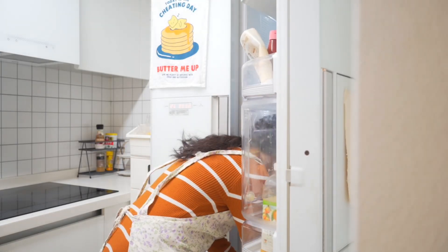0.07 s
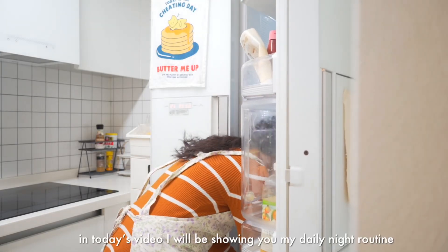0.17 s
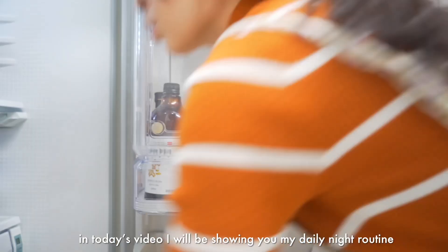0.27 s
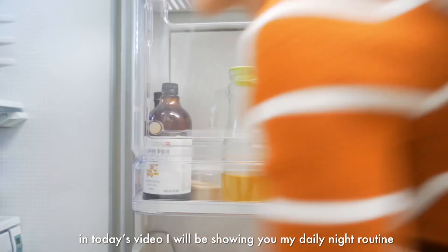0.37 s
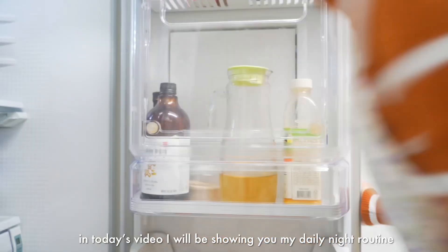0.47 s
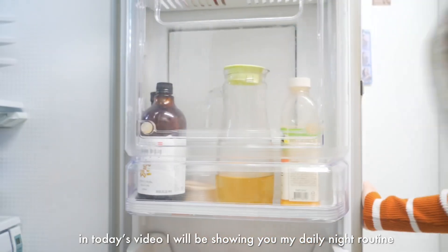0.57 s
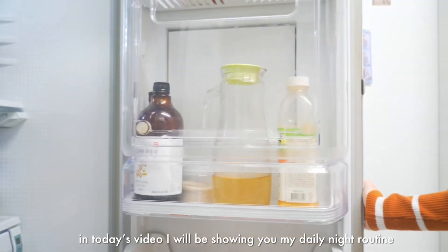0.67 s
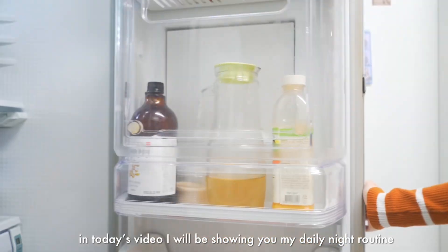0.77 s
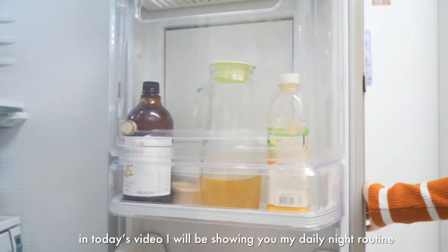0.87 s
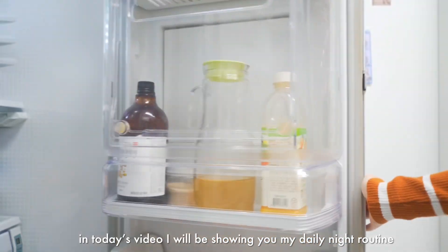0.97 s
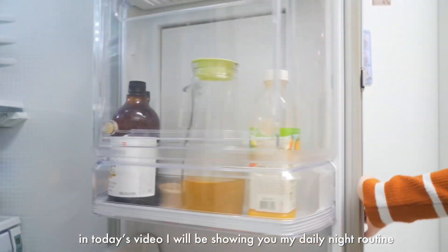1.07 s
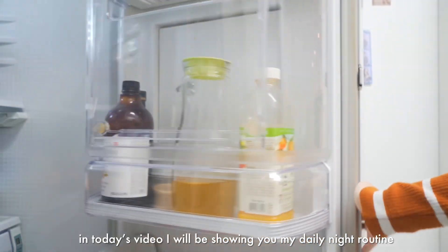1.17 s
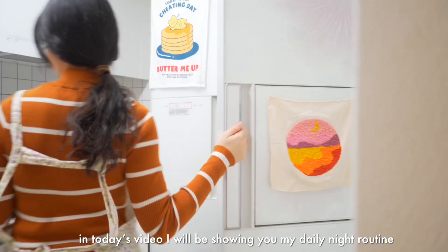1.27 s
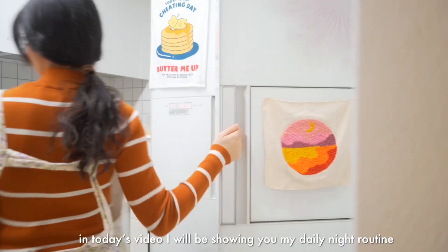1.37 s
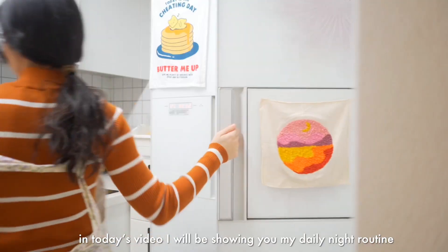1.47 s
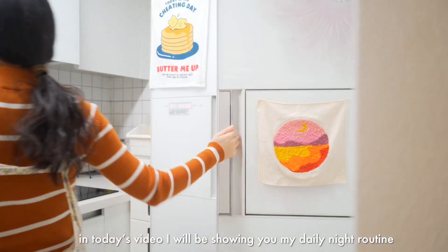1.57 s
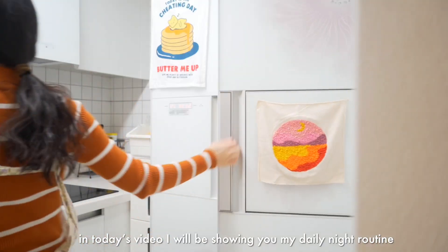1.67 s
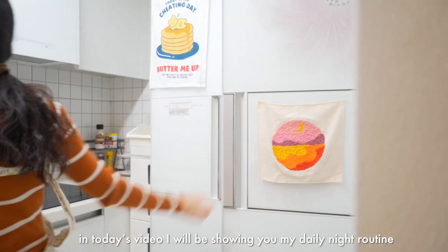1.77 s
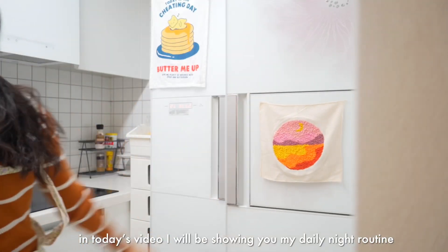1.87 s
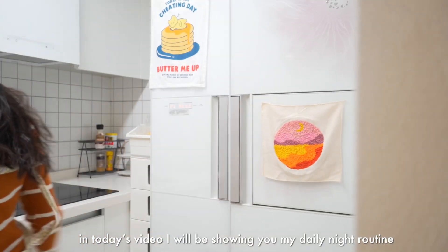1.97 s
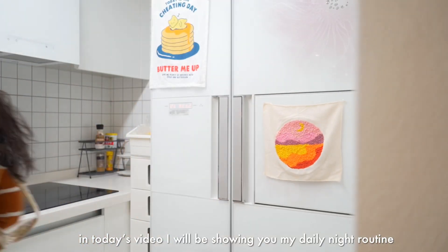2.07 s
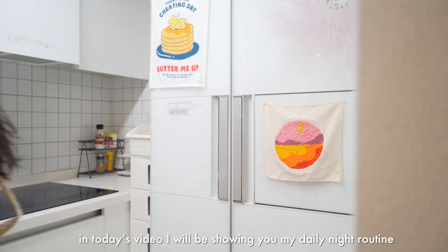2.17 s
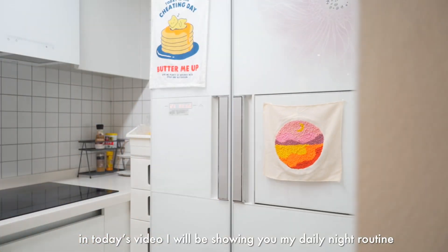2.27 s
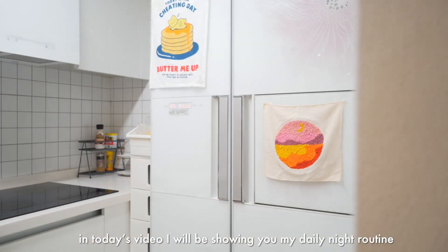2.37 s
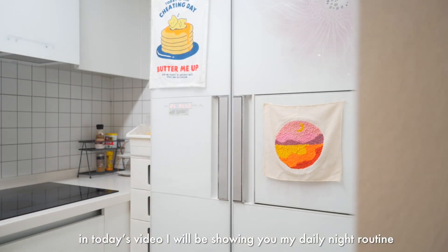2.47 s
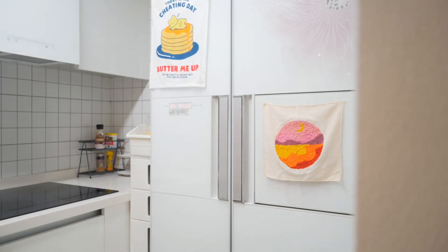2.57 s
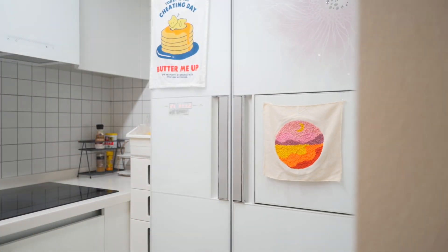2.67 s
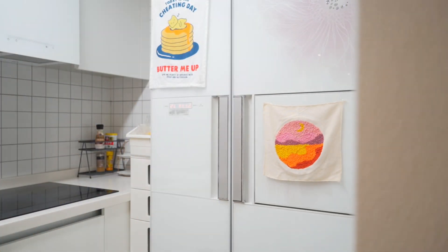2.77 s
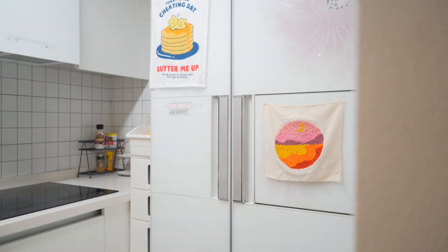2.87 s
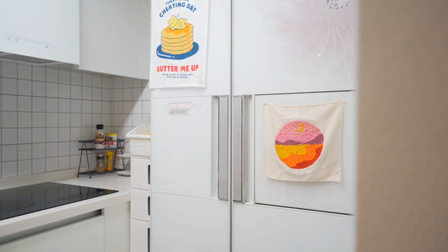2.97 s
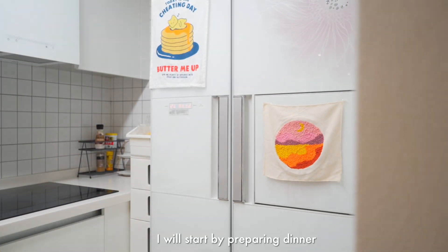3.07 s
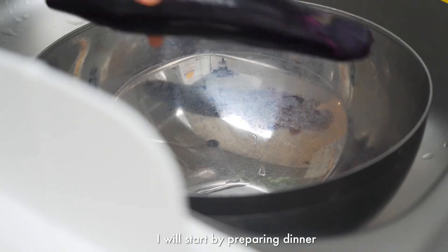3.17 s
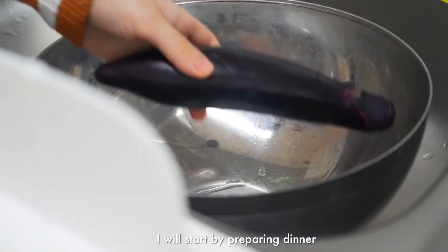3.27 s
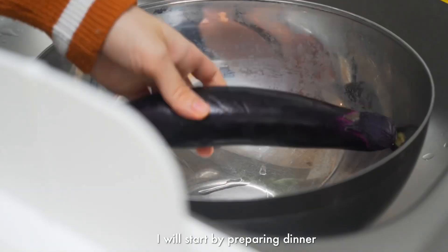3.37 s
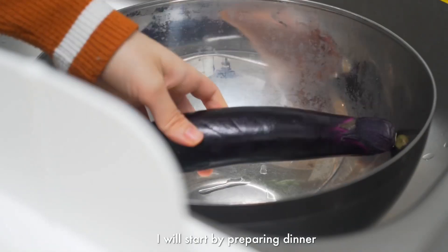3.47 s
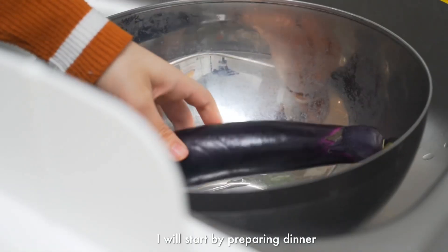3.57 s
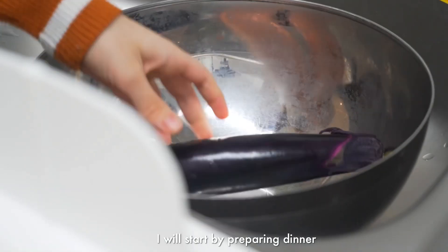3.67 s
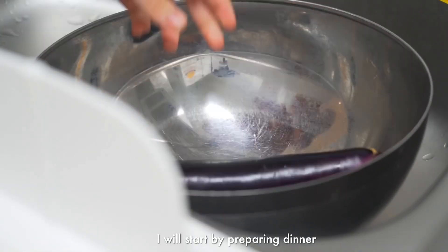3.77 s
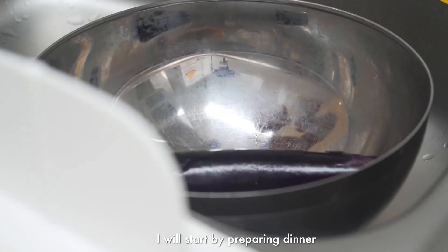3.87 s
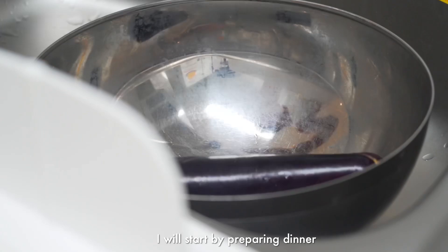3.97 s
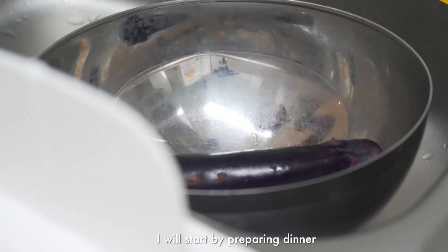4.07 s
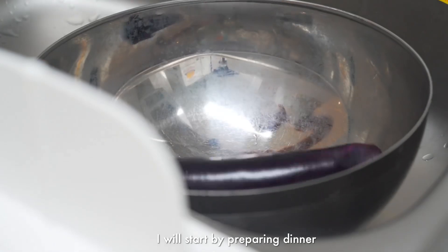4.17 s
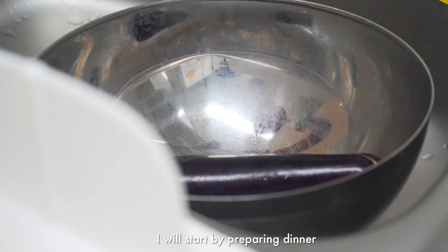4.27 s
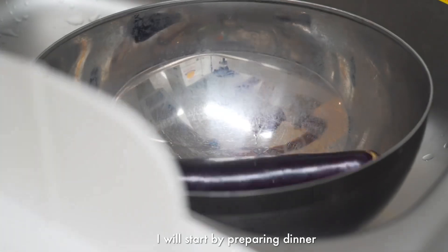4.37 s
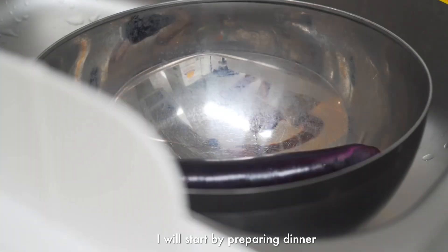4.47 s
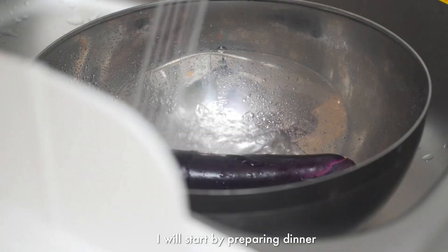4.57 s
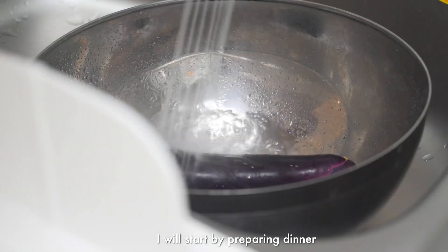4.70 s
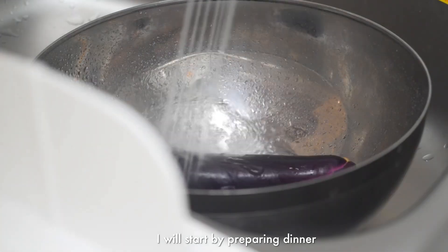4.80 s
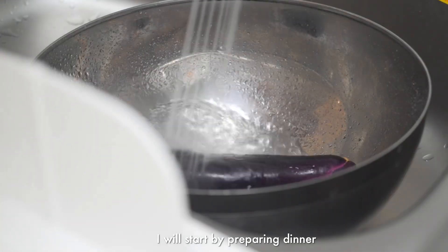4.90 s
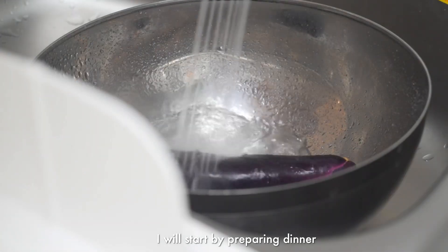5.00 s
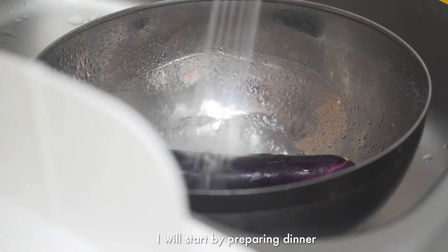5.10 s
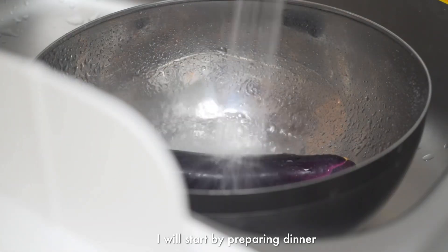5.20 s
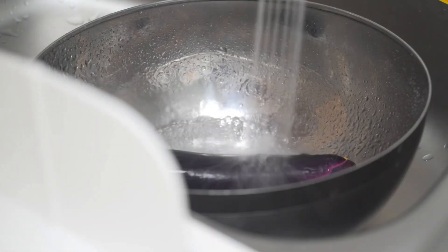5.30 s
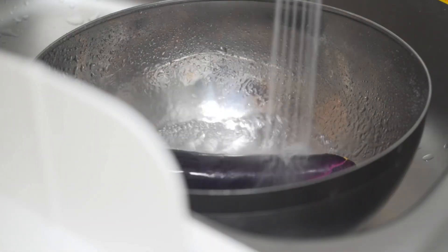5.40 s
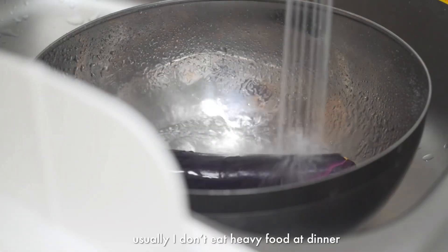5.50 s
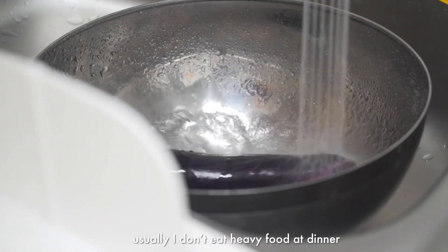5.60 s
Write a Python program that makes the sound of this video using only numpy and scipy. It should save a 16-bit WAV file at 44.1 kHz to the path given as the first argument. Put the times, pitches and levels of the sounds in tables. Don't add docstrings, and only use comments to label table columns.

```python
import sys
import numpy as np
from scipy import signal
from scipy.fft import rfft, irfft
from scipy.io import wavfile
from scipy.ndimage import uniform_filter1d

SR = 44100
rng = np.random.default_rng(int(sys.argv[2]) if len(sys.argv) > 2 else 0)


def volts_from_db(level):
    exponent = np.asarray(level, float) / 20
    return 10 ** exponent


def unload_audio(sound):
    columns = np.transpose(np.atleast_2d(sound))
    steps = np.round(np.clip(columns, -1, 1) * 32767)
    wavfile.write(sys.argv[1], SR, steps.astype(np.int16))


N = 248724
T = np.arange(N) / SR
CUT_S = 3.076

# (frequency [Hz], left-right likeness [-1 to 1])
SPRAY_SAME = [(60, 1.0), (180, 1), (550, 0.95), (1650, 0.69), (2800, 0.63), (4970, 0.48), (15000, 0.21)]


def evened(x):
    return x / np.sqrt(np.mean(x ** 2) + 1e-20)


def read(points, hz):
    f, value = np.transpose(points)
    return np.interp(np.log(hz + 1), np.log(f + 1), value)


def columns(rows):
    s, *values = np.transpose(rows)
    return [np.interp(T, s, v) for v in values]


def between(start, end, edge=0.0033):
    return np.clip((T - start) / edge, 0, 1) * np.clip((end - T) / edge, 0, 1)


def add(mix, s, sound):
    part = mix[:, round(s * SR):][:, :sound.shape[-1]]
    part += sound[..., :part.shape[1]]


def pair(left, other, colour, same, lag_s=0., lean=((1, 0), (2e4, 0))):
    hz = np.fft.rfftfreq(len(left), 1 / SR)
    a, b = rfft(left), rfft(other)
    likeness = np.clip(read(same, hz), -1, 1)
    delay = np.exp(-2j * np.pi * hz * lag_s)
    right = likeness * a * delay + np.sqrt(1 - likeness ** 2) * b
    half_db = read(lean, hz) / 2
    ports = np.array([a * volts_from_db(half_db), right * volts_from_db(-half_db)])
    return evened(irfft(volts_from_db(read(colour, hz)) * ports, len(left)))


def patchy(x, patchy_db, flicker_db, bins, frames):
    z = signal.stft(x, nperseg=256)[2]
    patches = rng.standard_normal(z.shape[:0:-1]).T
    patches = uniform_filter1d(patches, size=bins, axis=0)
    patches = evened(uniform_filter1d(patches, size=frames, axis=1))
    flicker = evened(uniform_filter1d(rng.standard_normal(z.shape[2]), size=2))
    z = z * volts_from_db(patchy_db * patches + flicker_db * flicker)
    return evened(signal.istft(z, nperseg=256)[1][:, :N])


def grains(per_s, spread_db):
    size = volts_from_db(spread_db * np.minimum(rng.exponential(1, N), 3)) * rng.uniform(-1, 1, N)
    return evened(size * (rng.random(N) < per_s / SR))


def resonate(x, hz, width_hz):
    r = np.exp(-np.pi * width_hz / SR)
    return evened(signal.lfilter([1, 0, -1], [1, -2 * r * np.cos(2 * np.pi * hz / SR), r * r], x))


def ring(x, modes, wander_db):
    out, t = 0, np.arange(x.shape[1])
    for hz, width_hz, db, drift_db in modes:
        wander = np.interp(t, np.arange(0, N, 3000), rng.standard_normal(N // 3000 + 1))
        level_db = db + wander_db * wander + drift_db * (t - t.mean()) / SR
        out = out + volts_from_db(level_db) * resonate(x, hz, width_hz)
    return np.pad(evened(out), ((0, 0), (N - len(t), 0)))


def burst(colour, t60s, same, rise=0.34, crack=0.69, lag_s=0., size=30000):
    noise = rfft(pair(*rng.standard_normal((2, size)), colour, same, lag_s))
    hz, t = np.fft.rfftfreq(size, 1 / SR), np.arange(size) / SR
    centres = np.array(t60s)[:, 0]
    out = 0
    for k, (centre, t60) in enumerate(t60s):
        share = read(np.c_[centres, np.arange(len(centres)) == k], hz)
        envelope = volts_from_db(-60 * t / t60) * (1 - np.exp(-t * centre / rise))
        out = out + irfft(noise * share, size) * envelope
    return out * (1 + crack * np.exp(-t / 0.0043))


def cluster(hz, t, spread):
    spread = spread * min(hz / 1200, 1)
    ratios = [1 + spread * (k + rng.uniform(-0.58, 0.69)) for k in (-1, 0, 1)]
    return sum(np.sin(2 * np.pi * hz * ratio * t) for ratio in ratios) / 2


def chime(modes, spread=0.0171, size=12000):
    t = np.arange(size) / SR
    out = 0
    for hz, db, t60 in modes:
        out = out + volts_from_db(db + 0.73 * rng.random() - 60 * t / t60) * cluster(hz, t, spread)
    return out / len(modes) ** .5


def booms(rows, rise, spread):
    out = np.zeros((1, N))
    for s, hz, db, t60 in rows:
        t = np.arange(0, min(t60, .5), 1 / SR)
        onset = (1 - np.exp(-t * hz / rise)) ** 2
        add(out, s, volts_from_db(db - 3.5 - 60 * t / t60) * cluster(hz, t, spread) * onset)
    return out


def struck(modes, hits, scatter):
    return [(s, hz * (1 + scatter * rng.uniform(-1.14, 1)), db + hit_db, t60)
            for s, hit_db in hits for hz, db, t60 in modes]


def room_tone():
    # (start [s], rumble level [dB], air level [dB])
    shots = [
        (0, -48.5, -55.5),
        (.05, -48.5, -60),
        (.236, -50, -51),
        (3.076, -48.5, -56.5),
        (4.49, -50, -62),
    ]
    # (frequency [Hz], density [dB per Hz])
    fridge_colour = [(15, -66), (25, -28), (70, -4), (151, -7.5), (216, -1), (460, -20), (718, -16.5),
                     (1500, -29.5), (3300, -120)]
    rumble_colour = [(12, -45), (35, 1), (80, -1.5), (130, 0.5), (250, -1.5), (450, -10), (850, -11),
                     (1100, -18.5), (3000, -40)]
    air_colour = [(500, -9), (1000, -13), (2000, -11), (5000, -15), (13000, -18), (16500, -19)]
    # (frequency [Hz], left-right likeness [-1 to 1])
    diffuse = [(60, 0.99), (180, 1), (550, 0.73), (1650, -0.096), (4970, -0.28), (15000, 0.06)]
    start, rumble_db, air_db = np.transpose(shots)
    shot = np.searchsorted(start[1:], T)
    fridge, rumble, air = (pair(*rng.standard_normal((2, N)), colour, diffuse)
                           for colour in (fridge_colour, rumble_colour, air_colour))
    hum = volts_from_db(-51) * np.sin(2 * np.pi * 81.3 * T) * between(0.19, 1.28, 0.05)
    return volts_from_db(rumble_db[shot]) * np.where(T < CUT_S, fridge, rumble) + volts_from_db(air_db[shot]) * air + hum


def squeezing():
    # (peak time [s], rise [s], crinkle level [dB], relative dull level [dB])
    squeezes = [(.535, 0.059, -47.5, -5.5), (.6, 0.05, -45, -5), (1.035, 0.067, -49.5, -0.5),
                (1.28, .09, -43.5, -8), (1.4, 0.23, -49, -5), (1.51, 0.094, -43, -8.5),
                (1.68, 0.3, -50.5, -2), (1.78, 0.35, -47.5, -10), (1.88, 0.14, -53, 4.5),
                (1.97, 0.18, -55.5, 10.5), (2.011, 0.022, -32.5, 4), (2.09, 0.1, -43.5, 15),
                (2.175, .12, -42, 7), (2.26, 0.041, -35.5, -5), (2.365, 0.12, -26.5, -9.5),
                (2.43, 0.054, -31.5, -4), (2.571, 0.095, -32.5, -5), (2.731, 0.018, -33, -1),
                (2.84, 0.26, -32, -19), (2.91, 0.15, -41.5, -5.5), (3.045, .03, -46, -7)]
    relax_db_per_s = 107
    rest_db, rest_dull_db = -64.5, 1.5
    s, rise, db, dull_db = np.transpose(squeezes)[:, :, None]
    t = T[::32]
    level_db = db - np.where(t < s, 20 * (s - t) / rise, relax_db_per_s * (t - s))
    crisp = volts_from_db(2 * rest_db) + volts_from_db(2 * level_db).sum(axis=0)
    dull = volts_from_db(2 * (rest_db + rest_dull_db)) + volts_from_db(2 * (level_db + dull_db)).sum(axis=0)
    return np.interp(T, t, np.sqrt(crisp)), np.interp(T, t, np.sqrt(dull))


def bag():
    # (frequency [Hz], density [dB per Hz])
    crinkle_colour = [(1470, -25), (2500, -4), (4590, -3.5), (5770, 0), (10000, -0.5), (15100, -0.5),
                      (16500, -9.5)]
    body_colour = [(88, -41), (150, -7), (419, -0.5), (507, -4), (641, -7), (690, -3.5), (5000, -24.5),
                   (6500, -49), (11000, -120)]
    # (time [s], peak level [dB], relative dull level [dB])
    snaps = [(0.2352, -49.5, 4), (0.3292, -51, -3), (0.598, -27, -8), (.605, -25.5, -7), (1.0286, -44, 1),
             (1.3674, -29, -20), (1.5398, -29.5, -12), (1.9969, -23.5, -2.5), (2.1209, -25, 2),
             (2.1519, -19, -9.5), (2.176, -23, -12), (2.2666, -19.5, -24), (2.3342, -28, 1),
             (2.389, -14.5, -17), (2.4676, -17.5, -16), (2.507, -18, -11), (2.56, -28.5, 0.5),
             (2.6354, -17.5, -14.5), (2.7268, -23, -7.5), (2.852, -27, -4)]
    # (frequency [Hz], left-right likeness [-1 to 1])
    near = [(100, 1), (600, 0.92), (1500, 0.67), (4000, 0.076), (15000, 0.068)]
    crisp, dull = squeezing()
    crinkle = pair(grains(14000, 2.2), grains(14000, 1.0), crinkle_colour, near, lag_s=7e-5)
    crinkle = patchy(crinkle, 1.4, 0.35, bins=20, frames=6)
    body = pair(grains(5000, 4.3), grains(5000, 0.8), body_colour, near, lag_s=3e-5)
    out = (volts_from_db(3.0) * crisp * crinkle + volts_from_db(1.0) * dull * body) * between(.236, 3.08)
    t60 = 0.12
    crisp_t60 = [(3000, t60), (12000, 0.73 * t60)]
    dull_t60 = [(400, 0.64 * t60), (2500, 4.3 * t60)]
    for s, db, dull_db in snaps:
        snap = burst(crinkle_colour, crisp_t60, near, lag_s=7e-5, size=8000)
        add(out, s, volts_from_db(db - 10.0) * snap)
        add(out, s, volts_from_db(db + dull_db - 5.5) * burst(body_colour, dull_t60, near, size=8000))
    return out * volts_from_db([[.9], [-.9]])


def door():
    # (time [s], frequency [Hz], level [dB], t60 [s])
    panels = [(.236, 40, -35, 0.23), (0.24, 194, -39.5, 0.16), (.325, 1000, -40.5, 0.075),
              (.51, 764, -47, .1), (.527, 763, -45, .15), (1.972, 236, -24, 0.08), (2.003, 57, -9, 0.11),
              (2.008, 210, -18, 0.12), (2.035, 48.6, -15.5, 0.26), (2.035, 300, -22, 0.13),
              (2.041, 201, -21, 0.089), (2.066, 190, -25.5, .25), (2.016, 880, -20, .04),
              (2.15, 109, -28, 0.24), (2.8, 45, -42, 0.95), (1.86, 44.7, -40, .4), (2.43, 120, -38, .3)]
    # (time [s], level [dB])
    tray = [(587, -2, .16), (786, 0, .08), (990, -1, 0.067), (1500, -8.5, 0.089), (1940, -5, .1),
            (3300, -12, .06)]
    tray_hits = [(0.599, -32.5), (.605, -37)]
    # (time [s], peak level [dB])
    slam = [
        (1.977, -38),
        (2.008, -13.5),
        (2.017, -21),
        (2.042, -26),
        (2.069, -21.5),
    ]
    # (frequency [Hz], density [dB per Hz])
    door_colour = [(21, -41), (35, -6.5), (70, -1), (129, -4.5), (325, -5.5), (758, -9.5), (1000, -9),
                   (2280, -23.5), (13400, -24.5), (16000, -44)]
    # (frequency [Hz], t60 [s])
    door_t60 = [(30, 2.4), (60, 0.69), (200, 0.71), (600, 0.38), (1500, 0.6), (4000, 0.32), (12000, 0.12)]
    # (time [s], peak level [dB])
    rattle = [(2.2673, -27), (2.384, -26), (2.447, -31), (2.507, -28), (2.638, -26), (2.7344, -26),
              (2.854, -23.5), (2.861, -21)]
    # (frequency [Hz], level [dB], t60 [s])
    bottles = [(1264, -0.5, 0.32), (1560, -5.5, 0.32), (2000, 4.5, 0.13), (2440, -17, 0.21)]
    # (frequency [Hz], density [dB per Hz])
    clink_colour = [(600, -16), (1100, -5), (2000, -2.5), (3200, -3.5), (4500, -5), (7000, -21)]
    clink_t60 = [(1200, 0.5), (4000, 0.24)]  # (frequency [Hz], t60 [s])
    out = np.zeros((2, N)) + booms(panels + struck(tray, tray_hits, 0.021), rise=0.43, spread=0.038)
    for s, db in slam:
        add(out, s, volts_from_db(db - 4) * burst(door_colour, door_t60, SPRAY_SAME, lag_s=5e-5, size=32768))
    for s, db in rattle:
        clink = burst(clink_colour, clink_t60, SPRAY_SAME, rise=1.5, crack=0.49, lag_s=5e-5, size=12000)
        add(out, s, volts_from_db(db - 10.5) * (chime(bottles) + volts_from_db(1.5) * clink))
    return out * between(-1, CUT_S + .004)


def drawer():
    # (frequency [Hz], level [dB], t60 [s])
    box = [(111, -8.5, 0.12), (208, 0.5, 0.059)]
    # (time [s], level [dB])
    roll = [(0.744, -27.5), (0.766, -23.5), (.787, -24), (0.808, -25), (.845, -19), (.866, -13), (.89, -16),
            (0.915, -20.5), (0.936, -24), (.96, -29.5), (0.984, -29)]
    return booms(struck(box, roll, 0.15), rise=0.59, spread=.015)


def sink():
    # (time [s], level [dB]); a low thump at 5.47 s goes with the spray's drop
    basin = [(75.7, 0.0026, 0.38)]
    basin_hits = [(3.079, -33.5), (3.32, -25.5), (3.53, -22.5), (4.078, -31.5), (5.466, -38.5)]
    belly = [(120, 2.5, 0.13), (190, -2, .09)]
    belly_hits = [(3.303, -18.5), (3.323, -18), (3.342, -24), (3.356, -32)]
    bottom = [(231.2, 2, 0.14), (272, -7.5, 0.53)]
    bottom_hits = [(3.529, -23.5), (3.553, -27), (4.079, -28.5), (4.109, -34), (4.155, -37.5)]
    rim = [(2246, 1.5, 0.079), (2690, -9, 0.076), (3720, -7.5, 0.078), (5500, -16, 0.097), (6700, -19, .1)]
    rim_hits = [(3.322, -34.5), (3.326, -31.5), (3.372, -47), (3.499, -49), (3.503, -44), (3.549, -40),
                (3.553, -39)]
    shut = [(480, -6, 0.3), (790, -3, 0.079), (1100, -9, 0.18), (1483, -5, 0.15), (1900, -8, 0.23),
            (2320, -8, .13), (2654, -15, 0.11), (5100, -16, .25)]
    shut_hits = [(4.4075, -30.5), (4.421, -36), (4.433, -35)]
    wall = [(1191, 0.5, 0.16), (1000, -8, 0.16)]
    wall_hits = [(3.53, -35), (3.545, -39), (4.079, -43), (4.13, -52)]
    curve = [(400, -0.5, 0.11), (534, -5, .06)]
    curve_hits = [(3.328, -26), (3.338, -31)]
    drain = [(124, 0, 0.33)]
    drain_hits = [(3.64, -37.5), (5.47, -37), (5.53, -38)]
    # (time [s], peak level [dB], relative spout ring and tick level [dB])
    lever = [
        (3.077, -24.5, -4),
        (3.113, -25.5, -18),
        (3.885, -48, -10),
        (3.92, -49, -10),
        (4.4073, -25, 8),
        (4.412, -43, 17),
        (4.419, -32, 10),
        (4.433, -37, 5),
    ]
    # (frequency [Hz], density [dB per Hz])
    lever_colour = [(90, -29), (180, -11), (290, 4), (690, -4), (940, -6), (1520, -5), (2250, -14),
                    (3300, -15), (4400, -25), (16000, -75)]
    lever_tick = [(2500, -4), (4200, -1), (7000, -7), (8800, -2), (10800, -15), (12800, 2), (14200, -13),
                  (16000, -22)]
    # (frequency [Hz], t60 [s])
    lever_t60 = [(200, 0.3), (1000, 0.44), (4000, 0.21), (12000, 0.13)]
    # (frequency [Hz], level [dB], t60 [s])
    lever_modes = [(471.6, -10, 0.92), (670, 5, 0.22), (1076, 3.5, 0.32), (1510, 5, 0.31), (1800, 1, 0.16)]
    spout_modes = [(3359, -7, 0.34), (3390, 0.5, 0.22), (3570, 4.5, 0.22), (3770, -7, 0.13)]
    # (time [s], thud level [dB], tick level [dB])
    bumps = [(3.293, -37.5, -56.5), (3.321, -25, -55), (3.503, -48, -52.5), (3.528, -27, -36.5),
             (3.533, -35, -34), (3.553, -31, -61), (4.078, -33.5, -49), (4.109, -53.5, -69.5)]
    # (frequency [Hz], density [dB per Hz])
    thud_colour = [(18, -36), (40, -2.5), (120, -3), (270, -7), (450, -6), (800, -20), (1300, -22.5),
                   (2300, -30), (3500, -41)]
    tick_colour = [(1470, -45), (2500, -23), (3800, -11), (4510, -17), (4650, -6), (5690, -3), (10800, -17),
                   (16000, -28)]
    # (frequency [Hz], t60 [s])
    thud_t60 = [(40, 0.98), (80, 0.61), (200, 0.53), (500, 0.35), (2000, 0.41)]
    tick_t60 = [(3000, 0.098), (7000, 0.21), (14000, 0.25)]
    parts = [(basin, basin_hits), (belly, belly_hits), (bottom, bottom_hits), (rim, rim_hits),
             (shut, shut_hits), (wall, wall_hits), (curve, curve_hits), (drain, drain_hits)]
    out = np.zeros((2, N))
    for modes, hits in parts:
        out += booms(struck(modes, hits, 0.0148), rise=0.56, spread=0.0243)
    for s, db, bright_db in lever:
        knock = burst(lever_colour, lever_t60, SPRAY_SAME, size=12000)
        add(out, s, volts_from_db(db - 9) * (knock + volts_from_db(-4.5) * chime(lever_modes)))
        tick = burst(lever_tick, [(4000, 0.82), (12000, 0.24)], SPRAY_SAME, crack=3.0, size=12000)
        bright = chime(spout_modes, spread=0.0178) + volts_from_db(-9.5) * tick
        add(out, s, volts_from_db(db + bright_db - 15.5) * bright)
    for s, thud_db, tick_db in bumps:
        thud = burst(thud_colour, thud_t60, SPRAY_SAME, rise=0.58, lag_s=5e-5, size=16384)
        tick = burst(tick_colour, tick_t60, SPRAY_SAME, crack=1.45, lag_s=5e-5, size=12000)
        add(out, s, volts_from_db(thud_db - 4.5) * thud)
        add(out, s, volts_from_db(tick_db - 1.5) * tick)
    return out


def swells(drive):
    # (time [s], frequency [Hz], level [dB], length [s])
    crossings = [(4.55, 985, -6, 0.063), (4.607, 2320, -2, 0.049), (4.65, 578, 1, .025),
                 (4.696, 3105, -5, .03), (4.79, 1744, -1.5, 0.012), (4.88, 3160, -1, 0.026),
                 (4.946, 2320, -2, .015), (4.983, 1508, -4, 0.043), (5.07, 2570, -4, .03),
                 (5.107, 660, -3, .04), (5.125, 1727, -3, 0.024), (5.2, 2050, -1.5, .035),
                 (5.25, 1770, -2, .03), (5.255, 3320, -3.5, .03), (5.346, 1752, -2, .02),
                 (5.39, 1040, -5, 0.037), (5.396, 2590, -0.5, 0.016), (5.46, 2320, -2.5, 0.013),
                 (5.22, 2480, -4, .05), (5.602, 3100, -6, .02), (5.17, 2860, -4, 0.054),
                 (4.66, 2570, -5, 0.027)]
    out = np.zeros((2, N))
    for s, hz, db, length in crossings:
        near = slice(round((s - 2 * length) * SR), round((s + 2 * length) * SR))
        swell = np.exp(-((T[near] - s) / length) ** 2)
        out[:, near] += volts_from_db(db) * swell * resonate(drive[:, near], hz, width_hz=49)
    return out


def spray():
    # (time [s], flow level [dB], share landing on the vegetable instead of the steel [0 to 1])
    jet = [(4.49, -28.5, 0.07), (4.52, -27.5, 0.01), (4.62, -26, 0.17), (5.14, -26, .0),
           (5.19, -25.5, 0.23), (5.468, -26, 0.64), (5.474, -29, 0.75), (5.57, -29, 0.98),
           (5.64, -28.5, 0.93)]
    # (frequency [Hz], density [dB per Hz])
    hiss_colour = [(2060, -31), (3500, -6), (4900, -15), (6570, -3), (10800, -1.5), (13500, 1), (15200, 6),
                   (16500, -37)]
    drum_colour = [(150, -85), (398, -8.5), (468, -17.5), (572, -4.5), (865, -10), (956, 0.5), (1240, -4),
                   (1720, -2), (5000, -9.5), (6500, -19.5), (11000, -120)]
    # (frequency [Hz], density [dB per Hz])
    fizz_colour = [(3500, -49), (5000, -16), (6300, -9), (7500, -17), (10000, -25)]
    knock_colour = [(100, -40), (330, -27), (420, -8), (560, 2.5), (9000, -11)]
    # (frequency [Hz], width [Hz], level [dB], drift as the jet moves [dB per s])
    deep_modes = [(579.7, 11, -1.5, -15), (615, 15, -0.5, -2), (645, 42, -3, 3), (673, 15, -1.5, 5),
                  (432, 20, -13.5, -8)]
    upper_modes = [(823.5, 6.6, -4.5, 6.5), (969, 37, -6, -1), (1045, 37, -5, 19), (1149, 12, -3, 7),
                   (1508, 31, 0.5, 7), (1742, 16, 3.5, 1), (1833, 13, 0, -11), (2030, 24, -9, 0),
                   (2215, 26, -2, -3), (2320, 55, 1.5, -10), (2553, 57, 2.5, 0), (2790, 160, 3, -2),
                   (3105, 67, 3, -3), (3650, 30, -7, 3)]
    # (frequency [Hz], left minus right level [dB])
    lean = [(60, 2), (180, -2), (550, 0.0), (1650, -3.5), (4970, -0.5), (15000, -1)]
    on_s = 4.4895
    hiss_db, off = columns(jet)
    since = np.maximum(T - on_s, 0)
    fizz_db = -27 + 26 * off + 18 * np.exp(-since / 0.3)
    drops = [grains(22000, 2.0) for port in range(2)]
    hiss = patchy(pair(*drops, hiss_colour, SPRAY_SAME, lean=lean), 0.68, 0.74, bins=8, frames=12)
    fizz = pair(*drops, fizz_colour, SPRAY_SAME, lean=lean)
    drum = patchy(pair(*drops, drum_colour, SPRAY_SAME, lean=lean), 2.8, 0.43, bins=2, frames=14)
    knocks = pair(grains(2500, 3.1), grains(2500, 2.2), knock_colour, SPRAY_SAME, lean=lean)
    knocks = knocks[:, int(4.3 * SR):]
    lively = volts_from_db(-5.0) * swells(drum)
    deep = ring(knocks, deep_modes, .8)
    upper = ring(knocks, upper_modes, 1.5)
    steel = volts_from_db(-3 - 32 * off) * deep
    steel = steel + volts_from_db(0.3 - 1.5 * off) * (volts_from_db(-2.5) * upper + volts_from_db(-1.0) * drum)
    build_up = 1 - 0.23 * np.exp(-since / 0.011)
    steel = (steel + lively) * build_up
    flow = volts_from_db(hiss_db) * between(on_s, 9, 0.00037)
    return flow * (volts_from_db(2.0) * hiss + volts_from_db(fizz_db) * fizz + steel)


def scene():
    return room_tone() + bag() + door() + drawer() + sink() + spray()


def top_cut(x):
    return signal.sosfilt(signal.butter(12, 17020, fs=SR, output="sos"), x)


def record(dry):
    low_pass = signal.firwin(801, 16050, window=("kaiser", 9), fs=SR)
    limited = signal.oaconvolve(dry, low_pass[None], "same")
    return top_cut(limited)


dry = scene()
out = record(dry)
unload_audio(out)
```